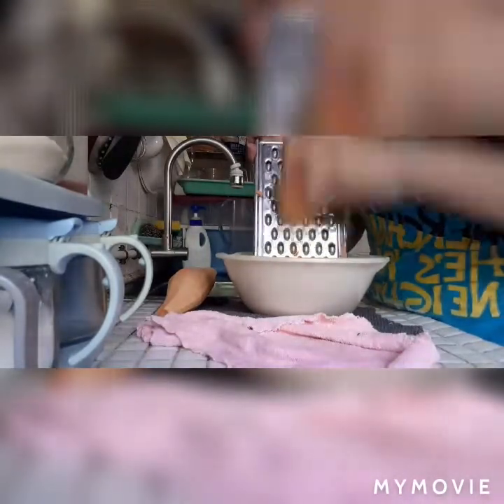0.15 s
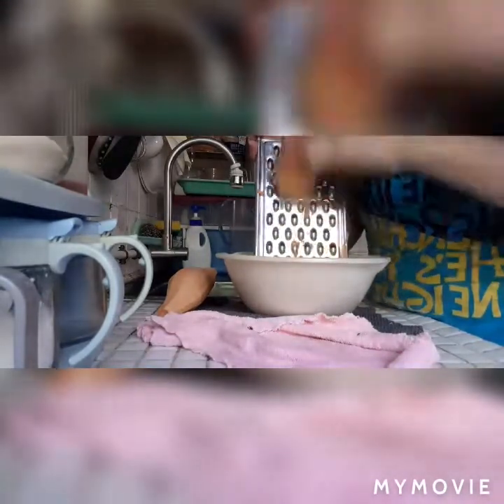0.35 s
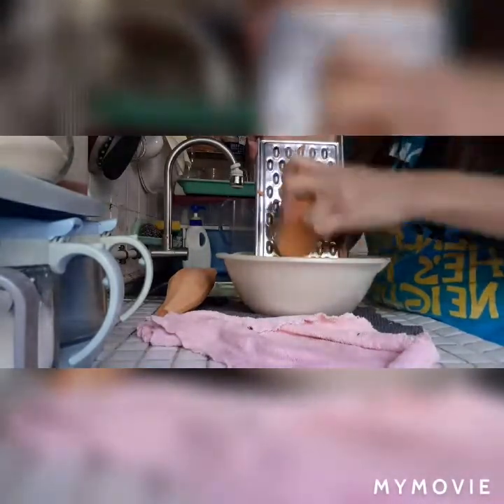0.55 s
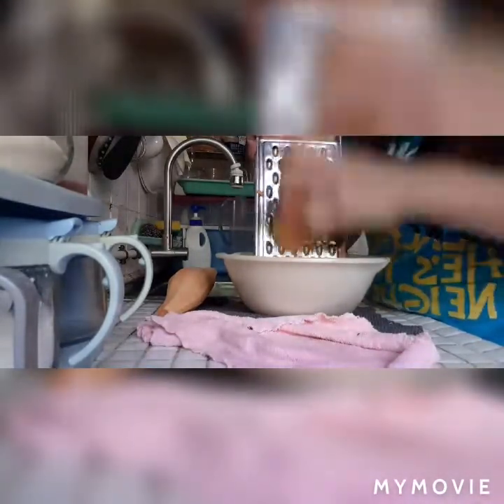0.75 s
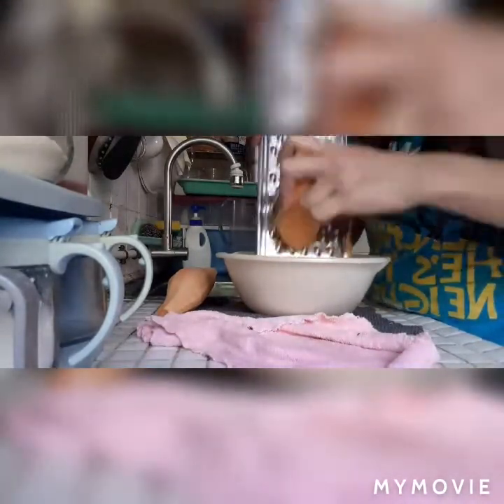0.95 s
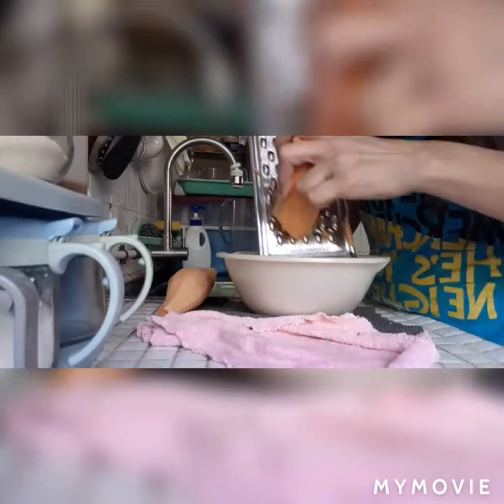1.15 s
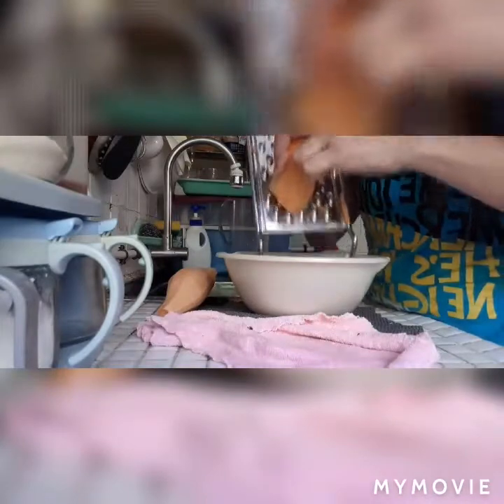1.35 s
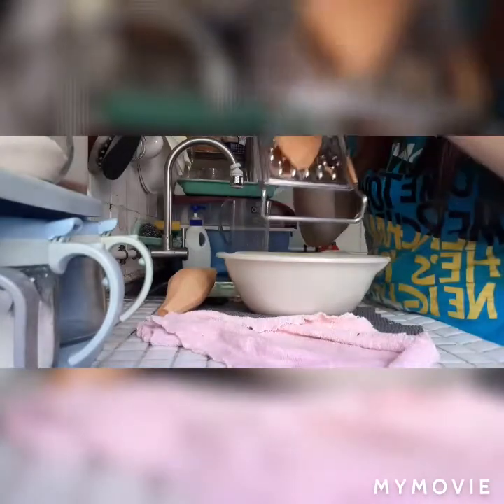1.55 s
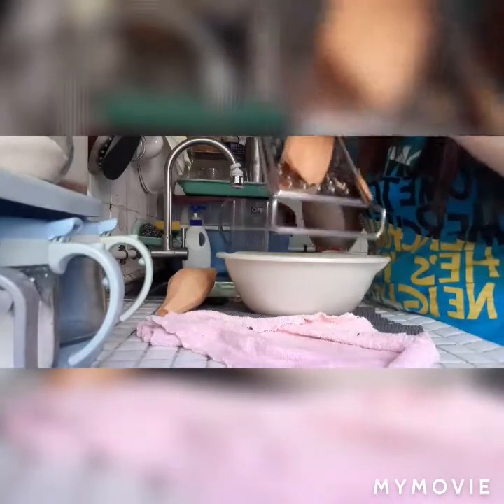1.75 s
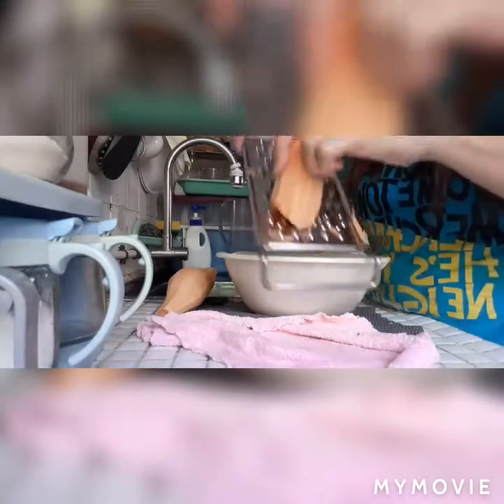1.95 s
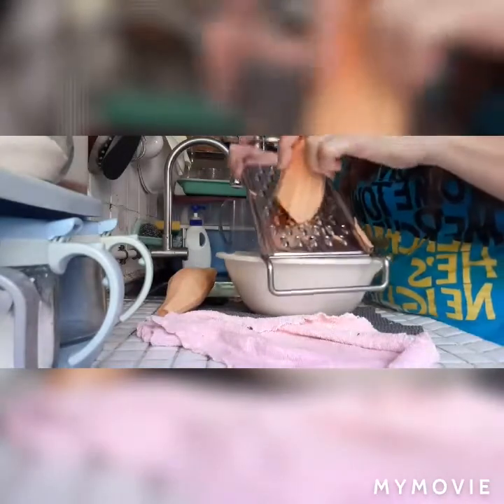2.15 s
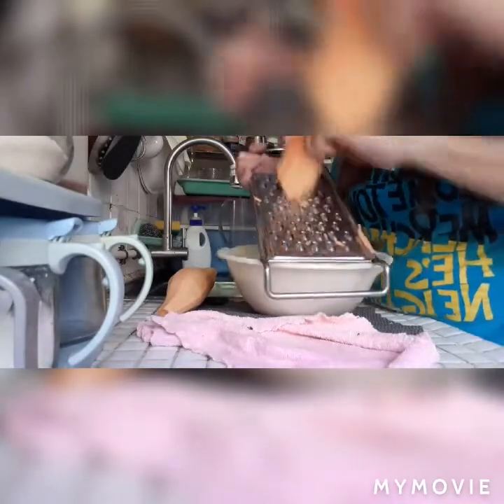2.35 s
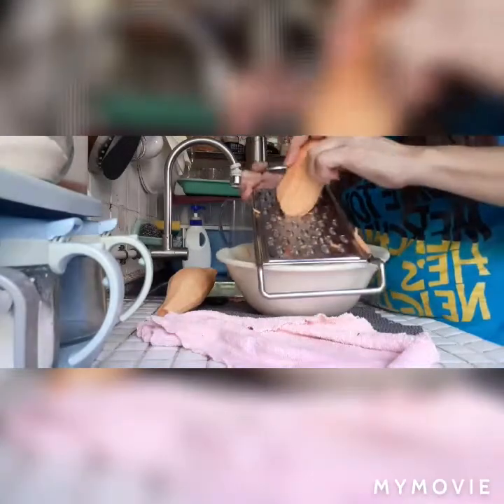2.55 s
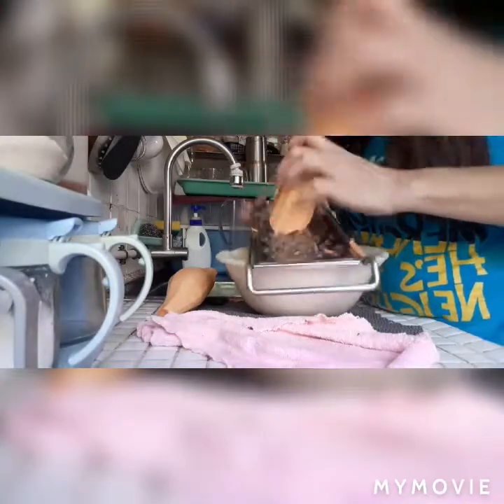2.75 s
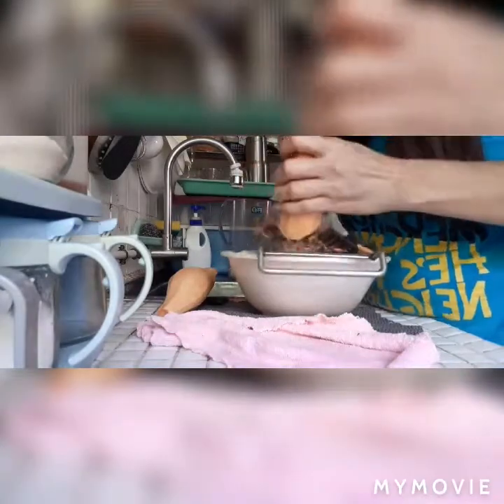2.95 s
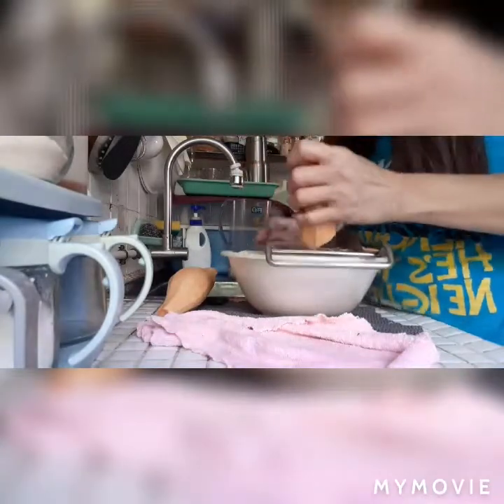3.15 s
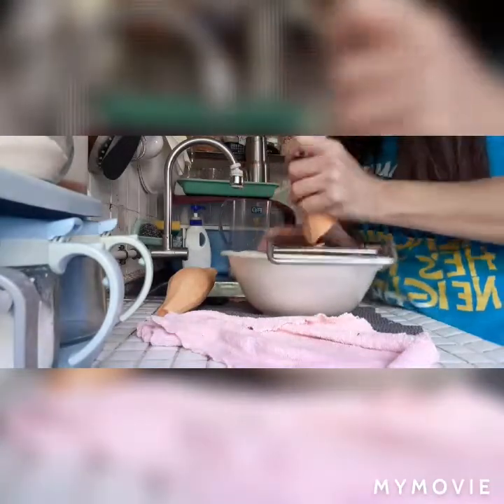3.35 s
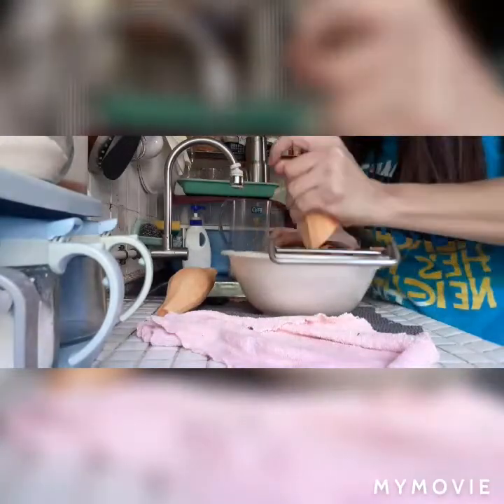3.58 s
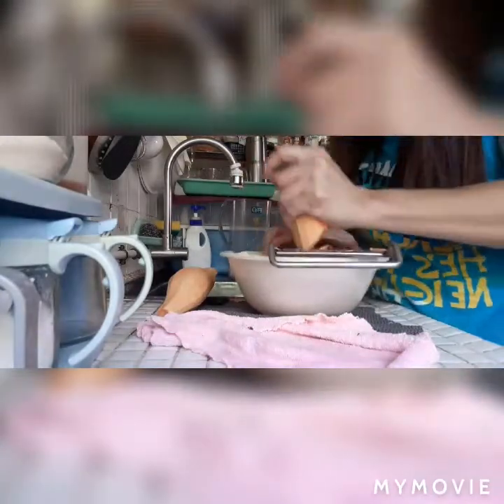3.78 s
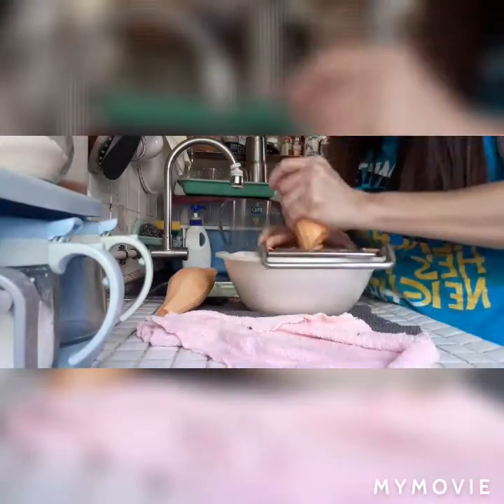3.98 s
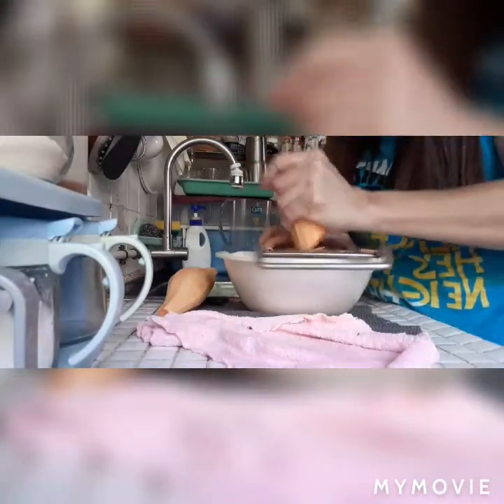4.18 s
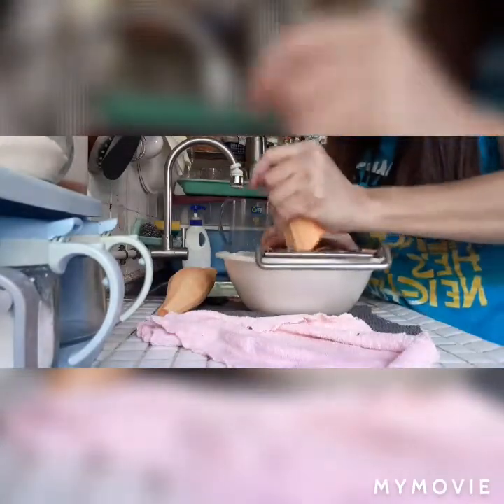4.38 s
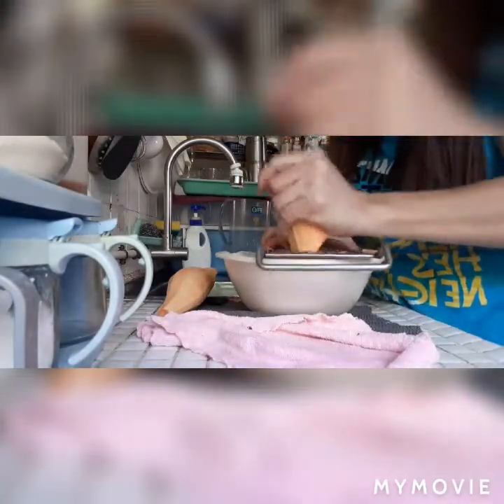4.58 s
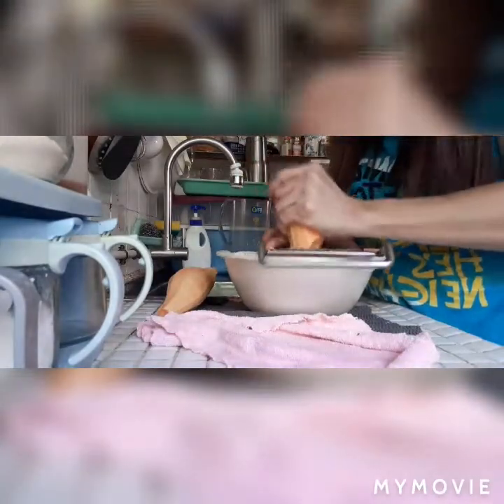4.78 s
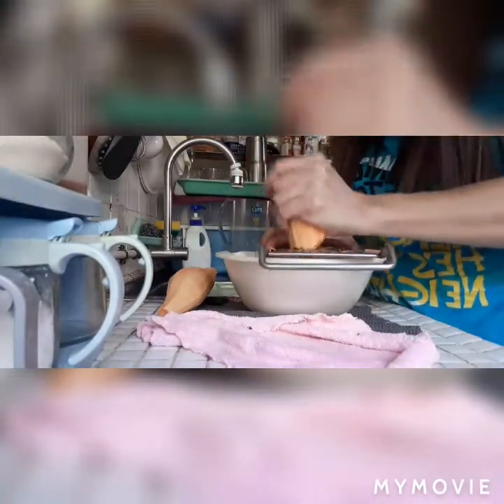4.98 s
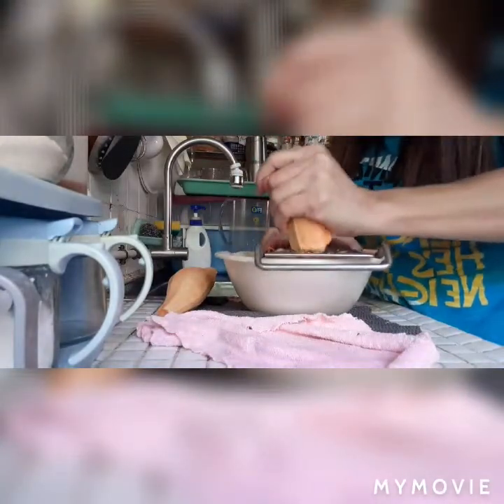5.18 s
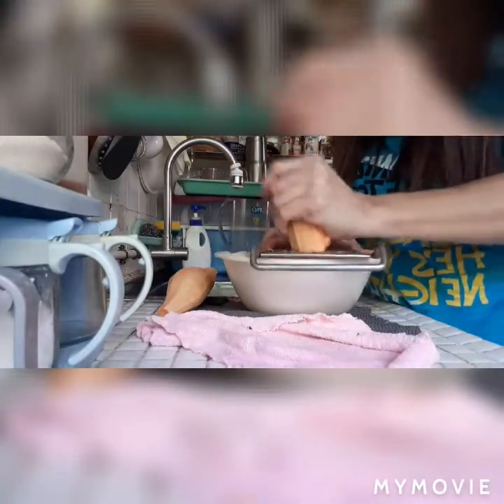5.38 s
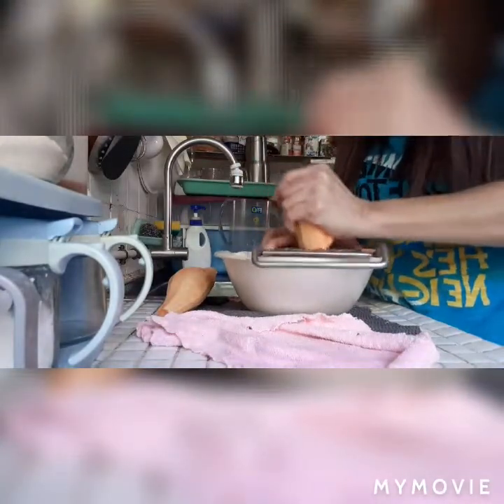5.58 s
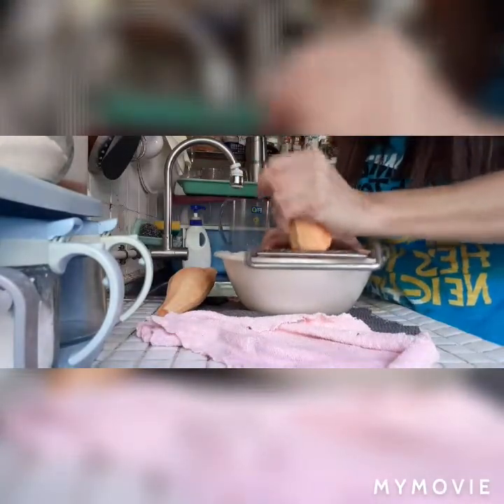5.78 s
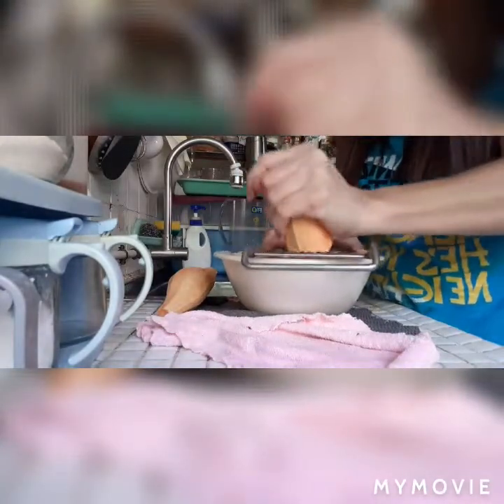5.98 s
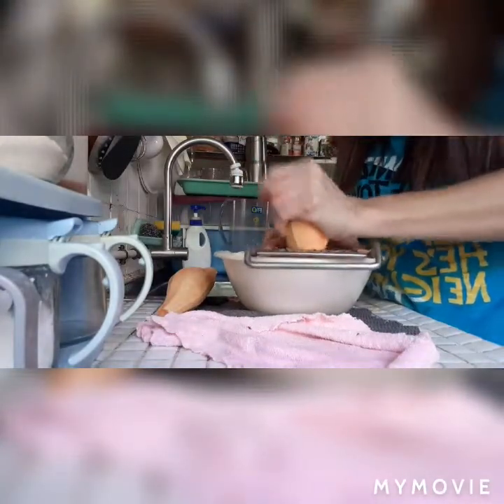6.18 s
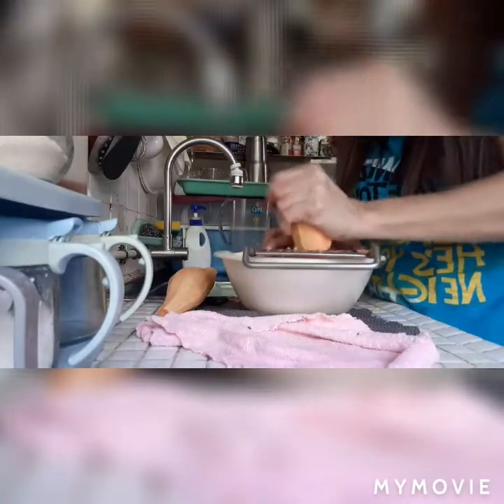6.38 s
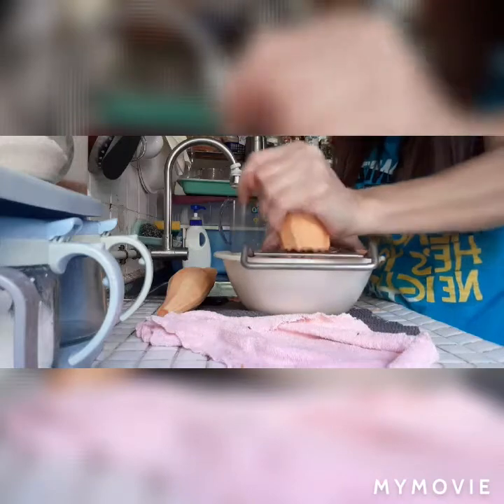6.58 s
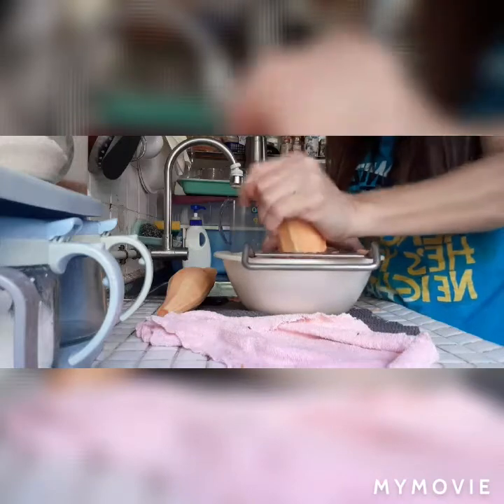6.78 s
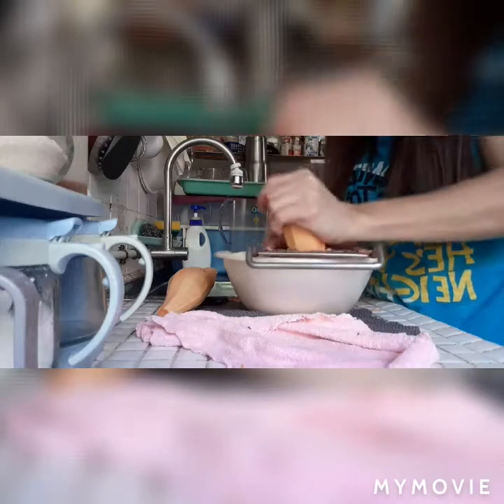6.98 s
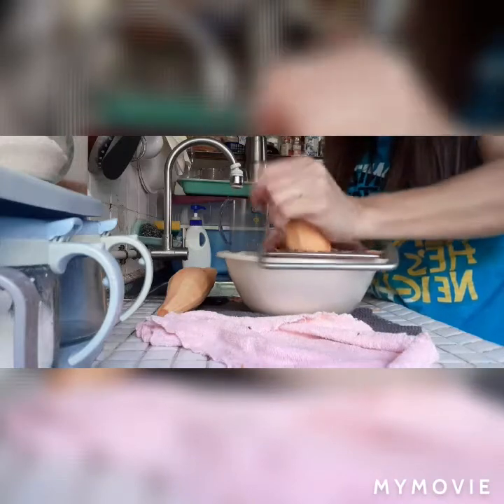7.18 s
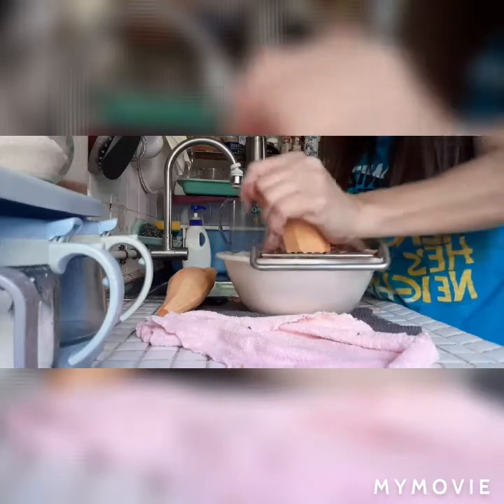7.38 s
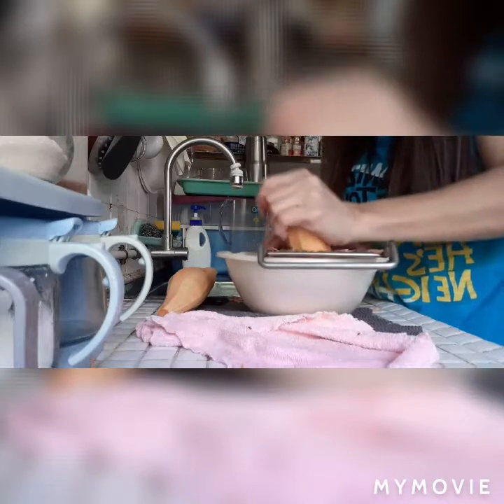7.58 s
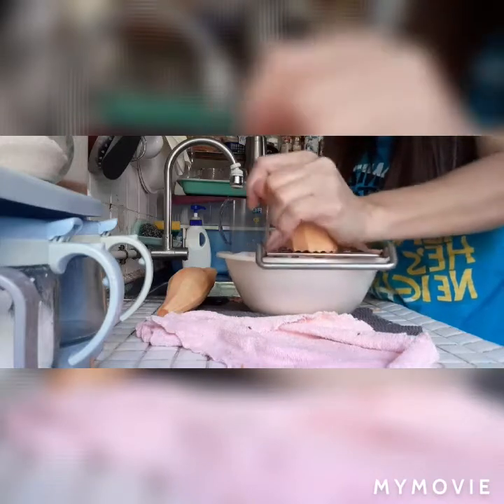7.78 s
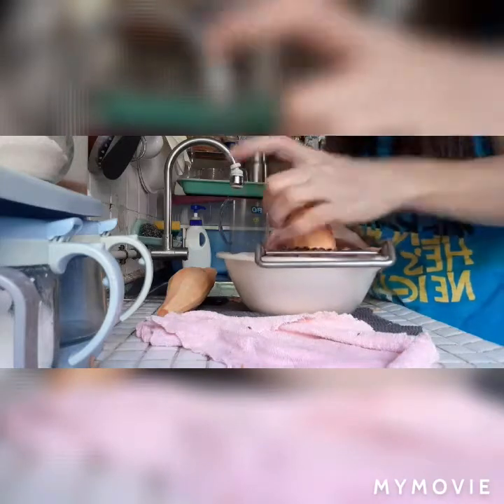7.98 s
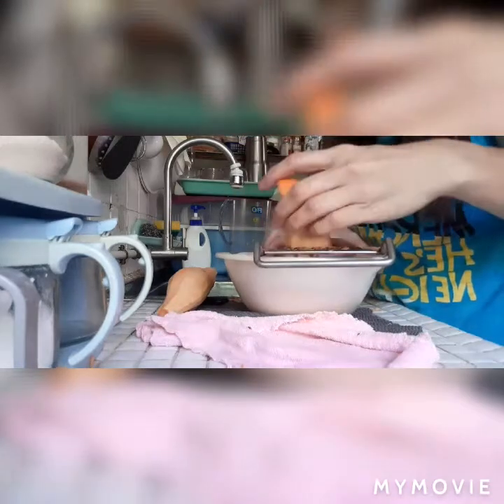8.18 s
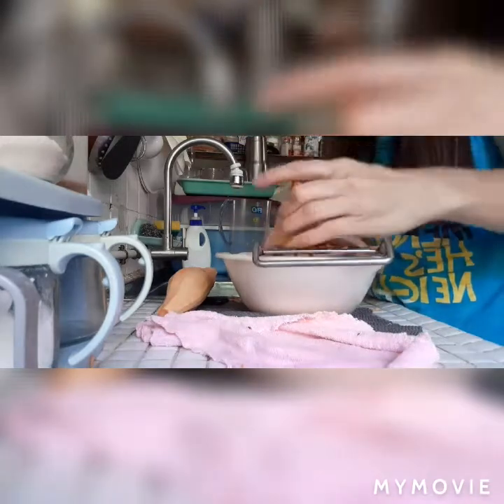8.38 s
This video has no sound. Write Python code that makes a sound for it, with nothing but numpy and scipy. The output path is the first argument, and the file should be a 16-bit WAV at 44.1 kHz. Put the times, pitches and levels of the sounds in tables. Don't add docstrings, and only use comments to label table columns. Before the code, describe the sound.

A close phone microphone in a small kitchen with short echoes; soft hum and low counter tremor underneath throughout. From 0 to 1 s a raw root is rubbed on a standing steel grater: a few quick, hissing, tearing strokes with hollow ringing around 850 Hz, fading into low thumps. Near quiet until 2 s, when the grater knocks dully on the bowl. Around 2.4 to 2.9 s come ringing scuffs, knocks and tiny high squeaks of wet skin. At 3.1 s it lands across the bowl with a sharp clack, quickly choked by the hand, followed by smaller knocks. From 3.5 to 7.8 s runs steady vigorous grating, roughly four bright cutting rasps a second with weaker returns between, slightly strengthening, with metallic shudders, tooth ticks, rim knocks and deep jolts. After 7.8 s it stops: a couple of low thumps, faint scuffs and thin squeaks.

```python
import sys
import numpy as np
from scipy import signal
from scipy.fft import rfft, irfft, next_fast_len
from scipy.io import wavfile
from scipy.ndimage import uniform_filter1d

SR = 44100
rng = np.random.default_rng(int(sys.argv[2]) if len(sys.argv) > 2 else 0)


def convert_level_to_amplitude(level_db):
    exponent = np.asarray(level_db, float) / 20
    return 10 ** exponent


def put_to_file(sound):
    columns = np.atleast_2d(sound).T
    safe = np.clip(columns, -1, 1)
    whole_steps = np.round(safe * 32767)
    wavfile.write(sys.argv[1], SR, whole_steps.astype(np.int16))


N = 371763

# (frequency [Hz], level per Hz [dB])
ROOM_COLOUR = [(40, -15), (110, -4.5), (250, -1.5), (400, -7), (850, -13), (1500, -16.5), (2700, -24),
               (3300, -34.5), (5000, -37.5), (7300, -54), (8600, -36), (10500, -45.5), (16000, -47)]
# (frequency [Hz], time to fall 60 dB [s])
ECHO_TIMES = [(200, 0.34), (400, 0.14), (800, 0.12), (3000, 0.21), (9000, 0.15), (16000, 0.17)]
# (frequency [Hz], level per Hz [dB])
SHAKE_COLOUR = [(28, -40.5), (45, 2), (80, 5), (130, 1.5), (200, -5.5), (300, -10), (450, -56.5),
                (1500, -110)]
# (start [s], end [s])
RUBBING_RUNS = [
    (0.0, 1.4),
    (3.5, 7.8),
]
# (time [s], level [dB], swell [s], sink [s])
LEANS = [(.55, -50.5, 0.067, .15), (.81, -39, 0.36, 0.086), (1.02, -38.5, 0.035, 0.46),
         (1.27, -44, 0.086, 0.054), (2.07, -35.5, 0.047, 0.095), (2.46, -42, 0.061, .06),
         (2.84, -43, 0.13, 0.075), (3.25, -44.5, 0.19, 0.11), (3.45, -50, .08, .06),
         (3.65, -46, 0.13, 0.31), (3.87, -33, 0.045, 0.026), (4.02, -48, 0.1, 0.16),
         (4.32, -39.5, 0.2, 0.063), (4.79, -40, 0.038, 0.052), (5.04, -35, 0.21, 0.13),
         (5.4, -41.5, 0.14, 0.24), (5.56, -39, 0.025, 0.13), (5.97, -38.5, .25, 0.047),
         (6.15, -45, .12, 0.049), (6.6, -29.5, 0.03, 0.011), (6.691, -31.5, 0.049, 0.065),
         (6.81, -36.5, 0.096, 0.07), (7.49, -41.5, 0.2, 0.11), (7.65, -45, .06, 0.2),
         (8.0, -48, 0.021, .06), (8.16, -35, 0.15, 0.18)]
# (time [s], level [dB], frequency [Hz])
JOLTS = [(0.994, -24, 130.5), (1.046, -29, 106), (1.139, -31, 129), (1.239, -32.5, 140), (2.443, -22, 115),
         (3.07, -40, 202), (4.936, -21, 96), (5.02, -18, 139), (5.319, -31, 88.8), (6.251, -29, 74),
         (6.58, -36, 116), (6.638, -20, 113), (6.754, -37, 96.9), (7.303, -25, 103), (7.398, -22, 78.1),
         (7.623, -22.5, 91.5), (7.984, -21, 97.2), (8.119, -28, 102.6)]
# (time of greatest force [s], hiss level [dB], rise [s], fall [s])
CUTTING_STROKES = [(0.0, -37.5, .01, 0.027), (.192, -30.5, 0.043, 0.075), (.491, -29.5, 0.054, 0.052),
                   (.576, -46, 0.051, 0.016), (.774, -30.5, 0.062, 0.051), (3.577, -37.5, 0.051, 0.052),
                   (3.859, -35, 0.081, 0.03), (4.095, -33.5, 0.053, 0.045), (4.356, -31, 0.06, 0.051),
                   (4.611, -30.5, 0.052, 0.058), (4.886, -32, 0.069, 0.059), (5.149, -29.5, 0.056, 0.046),
                   (5.221, -38, 0.005, 0.0064), (5.426, -30.5, 0.068, 0.059), (5.702, -30, 0.054, 0.06),
                   (5.983, -28.5, 0.059, 0.048), (6.254, -29.5, 0.062, 0.034), (6.308, -39, 0.0063, 0.043),
                   (6.533, -29, .076, 0.048), (6.804, -28, 0.054, 0.056), (7.074, -29.5, 0.055, 0.054),
                   (7.2, -52, 0.0078, 0.058), (7.379, -28, 0.064, 0.05), (7.651, -28.5, 0.054, 0.07)]
# (time of greatest force [s], hiss level [dB], rise [s], fall [s])
RETURN_STROKES = [(0.055, -47.5, 0.013, 0.023), (.108, -49, 0.059, 0.023), (.318, -50.5, 0.016, 0.034),
                  (.404, -50, 0.034, 0.026), (0.614, -48.5, 0.029, 0.01), (.67, -49, 0.051, 0.037),
                  (3.745, -43.5, .078, 0.018), (3.993, -40.5, 0.075, .029), (4.26, -41, 0.077, 0.022),
                  (4.509, -39, .068, 0.037), (4.784, -40.5, 0.1, 0.018), (5.042, -40.5, 0.08, 0.034),
                  (5.321, -39, 0.11, 0.024), (5.566, -38, 0.035, 0.063), (5.827, -40, 0.022, 0.089),
                  (6.13, -41.5, 0.081, 0.042), (6.4, -40.5, 0.055, 0.042), (6.684, -37.5, 0.066, 0.047),
                  (6.969, -40.5, 0.09, 0.033), (7.272, -40.5, 0.084, 0.034), (7.558, -37, 0.081, 0.026)]
# (time [s], hiss level [dB], rise [s], fall [s], ring over the hiss [dB])
BRUSHES = [(.89, -63, 0.017, .035, 7), (2.55, -68, .03, .03, 7), (2.66, -65, 0.027, .03, 4),
           (1.56, -73, 0.1, 0.15, -24), (2.033, -58.5, 0.018, 0.025, 21), (2.408, -43, 0.034, 0.024, 3),
           (2.458, -41, 0.02, 0.04, 7), (2.606, -60, 0.027, 0.019, 14), (2.732, -47.5, 0.051, 0.029, 12),
           (2.792, -49, 0.024, 0.035, 14.5), (2.88, -72.5, 0.038, 0.044, 18),
           (2.985, -69.5, 0.045, .03, 19.5), (3.086, -50, 0.011, 0.05, 15), (3.18, -62, 0.008, 0.029, -1),
           (3.116, -59, .004, .04, 0), (3.446, -48, 0.015, 0.04, -3), (7.93, -76, .06, 0.08, -6),
           (8.025, -73, 0.032, 0.06, 7), (8.229, -70.5, .044, 0.051, 15)]
# (frequency [Hz], level per Hz [dB])
HISS_COLOUR = [(5000, -12.5), (7000, -8.5), (7500, -12.5), (8400, 3), (8750, 5), (10300, 1.5), (11600, -4),
               (14000, -8), (16000, -6.5)]
# (frequency [Hz], level per Hz [dB])
STANDING_RASP = [(300, -4), (600, -12), (1300, -1.5), (1700, 2.5), (2250, 5), (2900, -8), (3300, -6.5),
                 (4300, -1.5), (8200, -8)]
# (frequency [Hz], level per Hz [dB])
FLAT_RASP = [(300, -1), (600, -10.5), (1150, 6.5), (1400, 0.5), (1700, 3.5), (2050, -1), (2450, -2.5),
             (4300, -2), (8200, -5.5)]
# (frequency [Hz], level [dB], time to fall 60 dB [s])
GRATER_MODES = [(424, -11.5, 0.058), (738, -13, 0.02), (786, 2, 0.076), (848, 5.5, 0.06), (930, -0.5, 0.04),
                (1142, -3, 0.042), (1600, -5, 0.045)]
# (frequency [Hz], level [dB], time to fall 60 dB [s])
WALL_MODES = [(1700, -7.5, .03), (2370, -12.5, 0.035), (2900, -15, 0.043), (3360, -13, 0.026),
              (4140, -13.5, 0.056), (4670, -26, 0.02)]
# (frequency [Hz], level [dB])
CLACK_COLOUR = [(700, -11.5), (1350, -9.5), (1650, 0), (2050, -4.5), (2500, 3.5), (3300, -8.5),
                (5000, -9.5), (9000, -30)]
# (time [s], level [dB], frequency [Hz])
SINGING = [(0.222, -28, 850), (.253, -34.5, 800), (.408, -40, 880), (.47, -31.5, 850), (0.504, -29, 840),
           (.535, -37.5, 860), (.617, -34, 820), (.672, -35.5, 780), (0.749, -31, 864), (2.4, -26.5, 940),
           (2.768, -31, 850), (2.83, -39, 835), (3.84, -41, 850), (4.11, -34, 830), (4.197, -39.5, 870),
           (4.262, -43, 934), (4.302, -34, 910), (4.378, -34.5, 900), (4.602, -28.5, 805),
           (4.873, -34, 800), (5.549, -36, 880), (5.675, -31, 790), (5.738, -27.5, 880), (5.865, -32, 850),
           (5.946, -29, 800), (6.1, -35, 785), (6.249, -26, 820), (6.763, -31, 765), (7.389, -21.5, 848),
           (7.626, -26, 760), (7.72, -38, 850), (2.7, -33.5, 830), (2.709, -26.5, 808), (2.739, -32, 964),
           (3.712, -29, 850), (3.815, -32, 960), (4.33, -34, 840), (4.358, -33.5, 870), (4.512, -28.5, 950),
           (4.642, -24.5, 837), (4.898, -37, 850), (5.169, -24.5, 810), (5.31, -29, 813), (5.325, -34, 403),
           (6.97, -33.5, 500), (7.245, -40.5, 1700), (.003, -44, 1750), (5.392, -28.5, 840),
           (5.431, -30, 890), (5.59, -20, 766), (5.7, -21.5, 840), (5.973, -21.5, 887), (6.277, -28.5, 810),
           (6.505, -28.5, 820), (6.546, -23.5, 870), (6.826, -21.5, 838), (6.527, -25, 840),
           (6.645, -35.5, 877), (6.917, -36, 845), (6.958, -32.5, 805), (7.059, -26.5, 784),
           (7.076, -25.5, 823), (7.412, -25.5, 850), (7.686, -30, 850)]
# (time [s], blow [dB], rim over blow [dB], crack over blow [dB])
GRATER_JOGS = [(0.037, -47, 18, -5.5), (.148, -29, -11, -10), (0.315, -35, 10.5, -22),
               (0.56, -27, -12, -24), (.872, -38, 13, -21), (2.403, -25, -12, -8.5), (2.471, -36, -3, 3),
               (2.648, -41, 4, -20), (4.146, -27, -6, -16), (4.425, -22, 7, -10), (4.495, -24, -11.5, -18),
               (4.692, -33.5, 2, -17), (4.972, -24.5, 0, -37), (5.04, -12.5, -9.5, -22),
               (5.131, -16.5, -16, -27), (5.24, -30.5, 1.5, -25), (6.148, -22, -20.5, -32),
               (6.31, -26, -1, -4), (6.705, -15.5, -16, -22), (7.352, -12.5, -18, -13),
               (7.458, -44.5, 15.5, 2), (7.559, -10.5, -25.5, -20)]
# (time [s], blow [dB], rim over blow [dB], bowl over blow [dB])
BOWL_KNOCKS = [(.054, -35, 3, -4), (2.014, -19, -3.5, -13), (2.036, -16.5, -17, -10.5),
               (2.075, -32, -5, -13), (2.235, -34, -13.5, -28), (2.4695, -13.5, -9, -14),
               (2.8, -14, -3.5, -9.5), (2.923, -33.5, -6, -8), (2.988, -39, 5, -5), (3.079, -12.5, -1, -3),
               (3.114, -16.5, -10, -22), (3.1743, -23, -0.5, -6), (3.407, -20, -13, -6),
               (3.439, -17, -6.5, -8.5), (3.499, -30, -7, -9), (3.54, -46, 8, 4), (3.674, -26, -2, -10),
               (3.708, -21.5, -14, -8.5), (3.751, -12, -6, -13.5), (3.939, -13, -4, -14),
               (3.958, -26, 6.5, 0), (3.971, -16, -15.5, -12), (4.008, -12, -6.5, -11),
               (5.555, -14.5, 1, -5), (5.823, -16, -5, -11), (8.221, -44, 2, -2)]
# (time [s], level [dB], frequency [Hz])
TOOTH_TICKS = [(0.17, -27, 2100), (0.3935, -44, 2220), (0.4379, -43, 2330), (0.4504, -38, 2190),
               (0.4678, -32, 1760), (0.5786, -38, 1640), (0.6085, -36, 2610), (0.6384, -36, 1790),
               (0.7337, -42, 1220), (0.9667, -50, 1650), (2.5456, -48, 1320), (4.0896, -32, 1760),
               (4.1954, -39, 2400), (4.569, -35, 1650), (4.7321, -33, 1700), (4.7616, -42, 1600),
               (5.1183, -31, 1800), (5.2624, -38, 1790), (5.2954, -33, 1640), (5.3727, -38, 1660),
               (5.4201, -32, 1720), (5.6521, -42, 2800), (5.673, -35, 1650), (5.7369, -29, 2900),
               (5.7793, -33, 2090), (5.9609, -30, 1630), (6.0766, -40, 2850), (6.2174, -37, 1790),
               (6.4577, -35, 1200), (6.4946, -23, 1650), (6.6907, -25.5, 1670), (6.7627, -32, 1250),
               (6.7765, -27, 1310), (6.9102, -40.5, 1690), (7.0389, -31, 1610), (7.3198, -37, 1760),
               (7.4579, -28, 2400), (7.5448, -31, 1240), (7.605, -30, 1620)]
# (time [s], length [s], frequency [Hz], rise in frequency [Hz], level [dB])
SKIN_SQUEAKS = [
    (2.52, .075, 5030, 30, -68),
    (2.58, .04, 5080, 10, -64),
    (2.61, .065, 5090, 0, -68),
    (2.585, .085, 6430, 10, -70),
    (8.016, .033, 10600, 0, -73),
    (8.0, .2, 6780, 0, -86),
    (8.345, .035, 15200, -900, -80),
]
# (frequency [Hz], level [dB], time to fall 60 dB [s])
LANDING_MODES = [(810, 10, 0.044), (850, -5.5, .11), (1720, 3, 0.056), (285, -4, 0.094), (540, -12, 0.069),
                 (633, -2, 0.06), (1170, -9.5, 0.065), (958, -7, 0.055), (1620, -10, .13),
                 (2137, -12, 0.055), (2366, -10, 0.062), (2700, -18, 0.059), (2972, -8, 0.035),
                 (3640, -14, .06)]

ROOM_DB = -53
REST_DB, BUSY_DB = -51, -48
LAID_FLAT_S = 1.5
UPRIGHT_TUNE = 1.04
CUT_RING_DB, CUT_RASP_DB = -2, -5.5
FIRM_DB = -40
RETURN_RING_DB, RETURN_RASP_DB = 4, -4.5
RING_KEEPS, RASP_KEEPS = 0.44, 0.21
SCUFF_RASP_DB, RASP_PER_RING = -9, 0.57
SNAG_SPREAD_DB, WALL_SPREAD_DB = 3, 5
KNOCK_CRACK_DB, KNOCK_RIM_HZ = -27.5, 1650
JOG_BOWL_DB, JOG_RIM_HZ = -27.5, 1904
BRIGHT_OCT_PER_DB = .03
LANDING_S, LANDING_DB = 3.078, -18.5
GRIP_S, GRIP_DB_PER_S = 3.132, 900
REBOUND_S, REBOUND_HZ, REBOUND_DB = 3.124, 412, -27


def evened(x):
    return x / np.sqrt(np.mean(x ** 2) + 1e-20)


def read(points, hz):
    f, value = np.transpose(points)
    return np.interp(np.log(hz + 1), np.log(f + 1), value)


def add(mix, s, sound):
    part = mix[round(s * SR):][:len(sound)]
    part += sound[:len(part)]


def colour(x, points):
    size = next_fast_len(len(x))
    gain = convert_level_to_amplitude(read(points, np.fft.rfftfreq(size, 1 / SR)))
    return evened(irfft(rfft(x, size) * gain, size)[:len(x)])


def flicker(hz):
    span = max(int(SR / hz), 1)
    return evened(uniform_filter1d(uniform_filter1d(rng.standard_normal(N), span), span))


def snaps(per_s, spread_db):
    size = convert_level_to_amplitude(spread_db * np.minimum(rng.exponential(1, N), 4))
    return size * (rng.random(N) < per_s / SR) * rng.choice([-1., 1.], N)


def patchy(x, depth_db, wide, long):
    z = signal.stft(x, nperseg=256, noverlap=192)[2]
    field = uniform_filter1d(rng.standard_normal(z.shape), wide, axis=0)
    field = evened(uniform_filter1d(field, long, axis=1))
    return evened(signal.istft(z * convert_level_to_amplitude(depth_db * field), nperseg=256, noverlap=192)[1][:N])


def ring(modes, detune, turns, damping=1):
    t = np.arange(4000) / SR
    return sum(convert_level_to_amplitude(db - 60 * t * damping / t60) * np.sin(2 * np.pi * (hz * d * t + p))
               for (hz, db, t60), d, p in zip(modes, detune, turns))


def clack(centre_hz, t60):
    hz = 900 * 5.5 ** ((np.arange(24) + rng.random(24)) / 24)
    db = read(CLACK_COLOUR, hz) - 4 * abs(np.log2(hz / centre_hz))
    return ring(zip(hz, db, t60 * (2000 / hz) ** .5), np.ones(24), 0.68 * rng.random(24))


def crack(t60):
    band = signal.butter(1, [2500, 7500], "bandpass", fs=SR, output="sos")
    t = np.arange(4000) / SR
    return signal.sosfilt(band, rng.standard_normal(len(t))) * convert_level_to_amplitude(-60 * t / t60)


def room_tone():
    level = convert_level_to_amplitude(ROOM_DB + 0.47 * flicker(5.8))
    return level * colour(rng.standard_normal(N), ROOM_COLOUR)


def leaning():
    t = np.arange(0, N + 64, 64) / SR
    busy = sum((t >= start) & (t < end) for start, end in RUBBING_RUNS)
    power = convert_level_to_amplitude(np.where(busy, BUSY_DB, REST_DB)) ** 2
    for s, db, swell, sink in LEANS:
        away = abs(t - s) / np.where(t < s, max(swell, .005), max(sink, .005))
        power = power + convert_level_to_amplitude(db - 17.8 * away ** 1.54) ** 2
    return np.interp(np.arange(N) / SR, t, np.sqrt(power))


def counter():
    out = colour(snaps(300, 1.8), SHAKE_COLOUR) * leaning()
    t = np.arange(2500) / SR
    swell = (t / 0.0059) * np.exp(1 - t / 0.0051) / 1.47
    for s, db, hz in JOLTS:
        add(out, s, convert_level_to_amplitude(db - 3.5) * -np.sin(2 * np.pi * hz * 1.293 * t) * swell)
    return out


def strokes():
    touches = [(*row, CUT_RING_DB, CUT_RASP_DB) for row in CUTTING_STROKES]
    for s, db, rise, fall in RETURN_STROKES:
        lighter = FIRM_DB - db
        ring_db, rasp_db = RETURN_RING_DB + RING_KEEPS * lighter, RETURN_RASP_DB + RASP_KEEPS * lighter
        touches.append((s, db, rise, fall, ring_db, rasp_db))
    return touches + [(*row, SCUFF_RASP_DB + RASP_PER_RING * row[-1]) for row in BRUSHES]


def force():
    t, power = np.arange(0, N + 64, 64) / SR, 0
    for s, hiss_db, rise, fall, ring_db, rasp_db in strokes():
        before, after = abs(s - t) / max(rise, .003), abs(t - s) / max(fall, .003)
        away = np.where(t < s, before ** 1.87 + 9 * np.maximum(before - 1.02, 0), after ** 2.5)
        over_hiss = np.array([[0], [ring_db], [rasp_db]])
        power = power + convert_level_to_amplitude(hiss_db + over_hiss - 12.1 * away) ** 2
    return [np.interp(np.arange(N) / SR, t, np.sqrt(p)) for p in power]


def hollow_ring(snags, upright, count=16, standing=4):
    place = np.repeat(rng.integers(0, count, N // 600 + 1), 600)[:N]
    place = np.where(upright, place % standing, standing + place % (count - standing))
    out = np.zeros(N)
    for k in range(count):
        modes = [(hz, db + SNAG_SPREAD_DB * rng.standard_normal(), t60) for hz, db, t60 in GRATER_MODES]
        if k >= standing:
            modes += [(hz, db + WALL_SPREAD_DB * rng.standard_normal(), t60) for hz, db, t60 in WALL_MODES]
        tune = UPRIGHT_TUNE if k < standing else 1
        spread = np.where(np.arange(len(modes)) < len(GRATER_MODES), 0.025, .03)
        body = ring(modes, tune + spread * rng.standard_normal(len(modes)), np.zeros(len(modes)))
        out += signal.oaconvolve(snags * (place == k), body / np.linalg.norm(body))[:N]
    return out


def grating():
    hiss, rung, rasp = force()
    rows = convert_level_to_amplitude(1.32 * flicker(100))
    upright = np.arange(N) < LAID_FLAT_S * SR
    fine = patchy(colour(snaps(14000, 2.1), HISS_COLOUR), 2.8, wide=4, long=12) * hiss * rows
    tears = snaps(3500, 2.5)
    tears = np.where(upright, colour(tears, STANDING_RASP), colour(tears, FLAT_RASP))
    coarse = patchy(tears, 4.0, wide=3, long=14) * rasp * rows
    snags = rung * evened(snaps(1500, 2.74) * convert_level_to_amplitude(2.8 * flicker(66)))
    return fine + convert_level_to_amplitude(-1.42) * coarse + convert_level_to_amplitude(-1.72) * hollow_ring(snags, upright)


def catches(count=12):
    rasp, which, out = force()[2], rng.integers(0, count, N), np.zeros(N)
    hits = rasp * evened(snaps(160, 3.35))
    for k in range(count):
        click = clack(3300, t60=0.025)[:800]
        out += signal.oaconvolve(hits * (which == k), click / np.linalg.norm(click))[:N]
    return convert_level_to_amplitude(-15) * out


def shudders():
    out, t = np.zeros(N), np.arange(-600, 900) / SR
    swell = np.exp(-np.where(t < 0, t / 0.0041, t / 0.008) ** 2)
    for s, db, hz in SINGING:
        waver = np.cumsum(evened(uniform_filter1d(rng.standard_normal(len(t)), 150))) * 45 / SR
        main = np.sin(2 * np.pi * (hz * t + waver + rng.random()))
        lower = np.sin(2 * np.pi * (0.926 * hz * t - waver + rng.random()))
        add(out, s + t[0], convert_level_to_amplitude(db - 1.0) * swell * (main + convert_level_to_amplitude(-9.5) * lower))
    return out


def blows():
    hits = [(*row, KNOCK_CRACK_DB, KNOCK_RIM_HZ) for row in BOWL_KNOCKS]
    for s, db, rim_db, crack_db in GRATER_JOGS:
        rim_hz = JOG_RIM_HZ * 2 ** (BRIGHT_OCT_PER_DB * (crack_db - KNOCK_CRACK_DB))
        hits.append((s, db, rim_db, JOG_BOWL_DB, crack_db, rim_hz))
    return sorted(hits)


def knocks():
    out, t = np.zeros(N), np.arange(4000) / SR
    push = -np.sin(2 * np.pi * 1150 * t) * np.exp(-t / 0.00054)
    for s, blow_db, rim_db, bowl_db, crack_db, rim_hz in blows():
        steel = ring(GRATER_MODES[1:], 0.965 + .07 * rng.random(6), .1 * rng.random(6), damping=1.9)
        rim = clack(rim_hz, t60=0.022)
        bowl = ring([(323, -3.5, 0.045), (362, -10.0, 0.082)], 1.0 + 0.3 * rng.random(2), [0, 0])
        sound = steel / abs(steel).max()
        sound += convert_level_to_amplitude(rim_db) * rim / abs(rim).max()
        sound += convert_level_to_amplitude(bowl_db) * bowl / abs(bowl).max()
        sound += convert_level_to_amplitude(crack_db + 1.5) * crack(0.038)
        rise = .0007 * max(convert_level_to_amplitude(-.9 * (rim_db + 10.0)), 1)
        add(out, s - rise, convert_level_to_amplitude(blow_db) * sound * np.minimum(t / rise, 1))
        if rim_db > -10:
            add(out, s - rise, convert_level_to_amplitude(blow_db + 0.35 * rim_db - 8.5) * push)
    return out


def ticks():
    out = np.zeros(N)
    for s, db, hz in TOOTH_TICKS:
        modes = [(hz, 0, 0.024), (hz * 1.8, -5, .012), (hz * .72, -6, .015)]
        tick = ring(modes, .95 + 0.11 * rng.random(3), [0, 0, 0])[:1500]
        add(out, s, convert_level_to_amplitude(db + 2) * tick / abs(tick).max())
    return out


def squeaks():
    out = np.zeros(N)
    for s, length, hz, rise_hz, db in SKIN_SQUEAKS:
        t = np.arange(int(length * SR)) / SR
        wobble = np.cumsum(rng.standard_normal(len(t))) * 0.064
        grip = convert_level_to_amplitude(3.9 * evened(uniform_filter1d(rng.standard_normal(len(t)), 300)))
        whistle = np.sin(2 * np.pi * (hz + rise_hz * t / length / 2) * t + wobble)
        add(out, s, convert_level_to_amplitude(db) * grip * whistle * signal.windows.tukey(len(t), .4))
    return out


def landing():
    out, t = np.zeros(N), np.arange(4000) / SR
    count = len(LANDING_MODES)
    steel = ring(LANDING_MODES, np.ones(count), np.arange(count) / 3) * np.minimum(t / 0.0006, 1)
    choke = convert_level_to_amplitude(-GRIP_DB_PER_S * np.maximum(t + LANDING_S - GRIP_S, 0))
    add(out, LANDING_S, convert_level_to_amplitude(LANDING_DB) * steel * choke)
    rattle = clack(1600, t60=0.063) + convert_level_to_amplitude(7) * crack(0.059)
    add(out, LANDING_S, convert_level_to_amplitude(LANDING_DB - 12.5) * rattle)
    rock = np.sin(2 * np.pi * REBOUND_HZ * t) * np.exp(-((t - .015) / 0.0085) ** 4)
    add(out, REBOUND_S - .015, convert_level_to_amplitude(REBOUND_DB) * rock)
    return out


def kitchen(x):
    taps = np.zeros(SR // 2)
    at = np.arange(150, len(taps) - 20, 20)
    taps[at + rng.integers(0, 20, len(at))] = rng.choice([-1., 1.], len(at))
    hz, t, z = signal.stft(taps, SR, nperseg=256)
    fade = convert_level_to_amplitude(-60 * t / read(ECHO_TIMES, hz)[:, None])
    tail = signal.istft(z * fade, SR, nperseg=256)[1]
    return signal.oaconvolve(x, tail / np.linalg.norm(tail))[:N]


def scene():
    rubbed = grating() + catches() + shudders() + squeaks()
    struck = knocks() + ticks() + landing()
    echoes = kitchen(convert_level_to_amplitude(-9) * rubbed + convert_level_to_amplitude(-7.5) * struck)
    mix = room_tone() + counter() + rubbed + struck + echoes
    return np.array([mix, mix])


def band_limit(x):
    return signal.sosfilt(signal.butter(12, 17020, fs=SR, output="sos"), x)


def record(dry):
    low_cut = signal.butter(2, 40, "highpass", fs=SR, output="sos")
    rounded = .42 * np.tanh(signal.sosfilt(low_cut, dry) / .42)
    edge = signal.firwin(511, 15780, window=("kaiser", 9), fs=SR)
    return band_limit(signal.oaconvolve(rounded, edge[None], "same"))


dry = scene()
out = record(dry)
put_to_file(out)
```